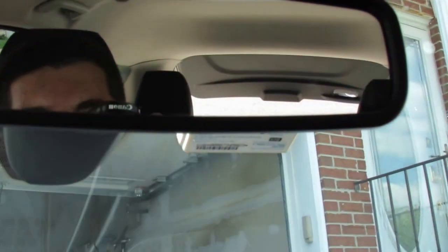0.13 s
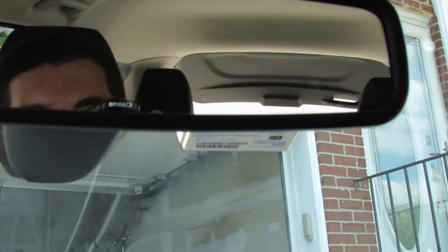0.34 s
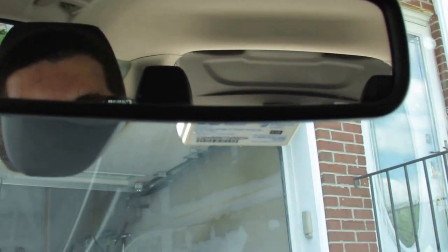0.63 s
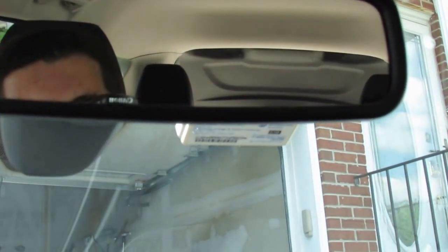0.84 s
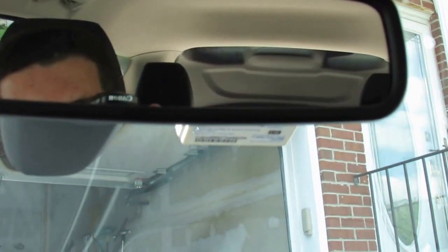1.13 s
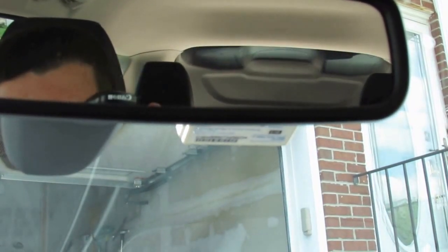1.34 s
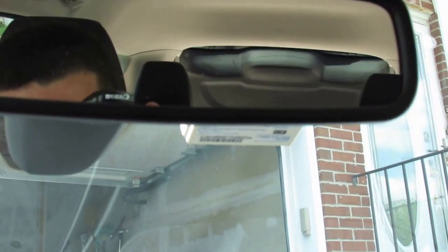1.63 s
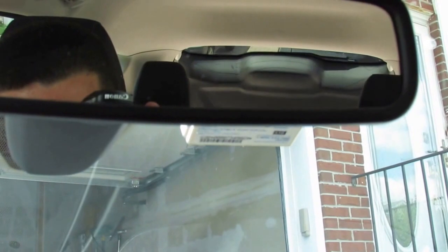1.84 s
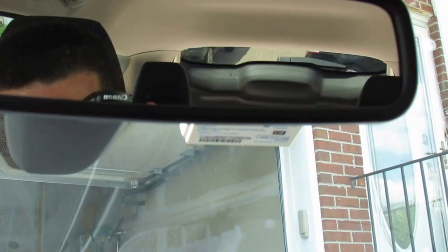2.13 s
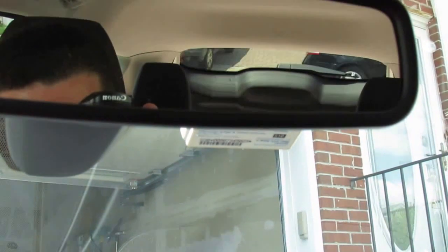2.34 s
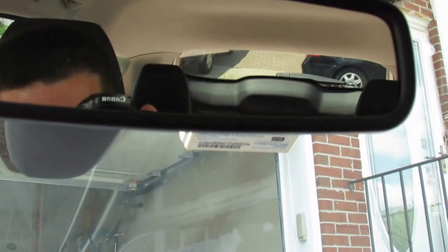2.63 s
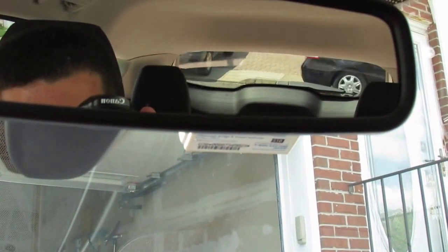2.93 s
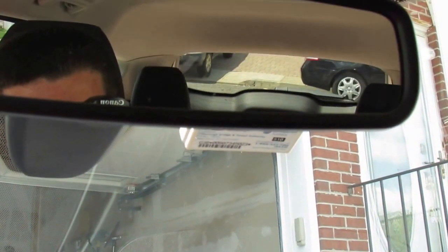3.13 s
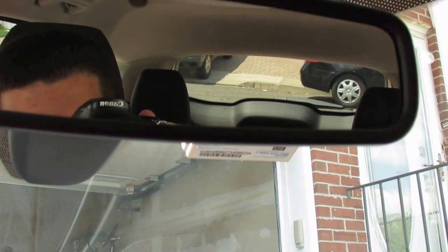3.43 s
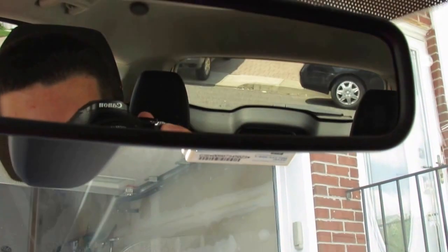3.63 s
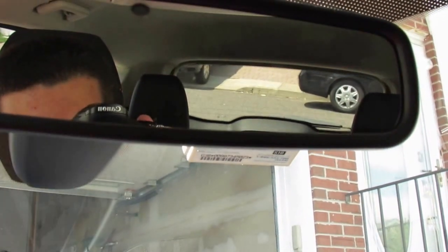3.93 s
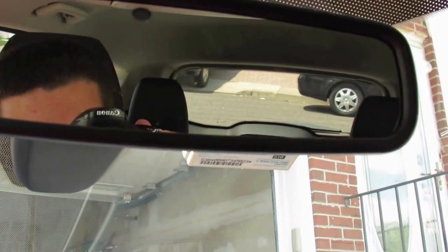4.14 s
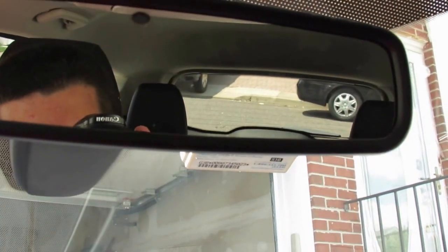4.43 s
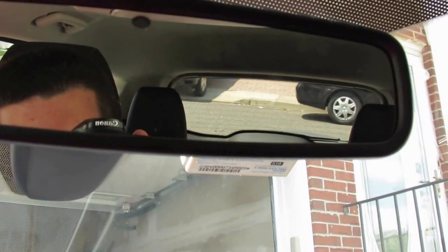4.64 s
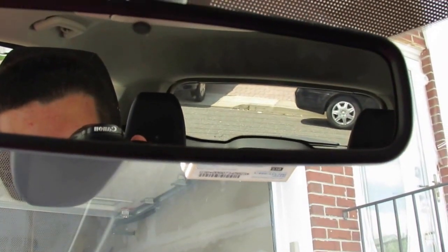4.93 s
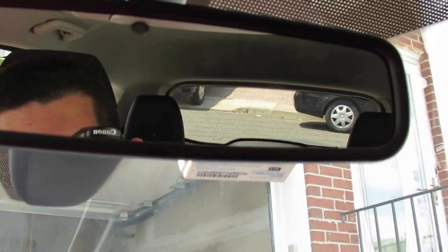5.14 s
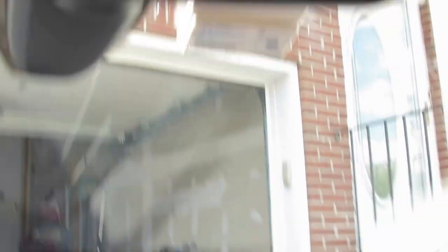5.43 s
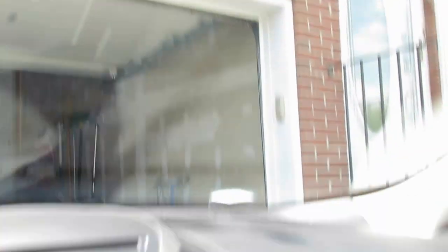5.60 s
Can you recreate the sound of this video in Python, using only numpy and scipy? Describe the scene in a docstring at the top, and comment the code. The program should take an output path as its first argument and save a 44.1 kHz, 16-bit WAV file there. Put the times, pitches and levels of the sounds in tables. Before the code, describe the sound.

Inside a parked car, the engine idles under a steady rush of air while the motorised rear hatch lowers with a low, rough hum. The hatch lands with a deep thump and a sharp metallic clack. The motor hums again briefly and the lock pulls tight with a hollow clunk. A few faint scuffs and ticks follow as the hand-held microphone is moved.

```python
"""An engine idles and air rushes, heard inside a car parked at a garage, as the power liftgate hums down.
The gate drops into its latch: the steel catch clacks, and the gate pumps the cabin air into a deep thump.
A moment later the motor cinches the lock, whose bolt and pawl strike with a hollow clunk.
The hand-held camera, whose gain ducks under the thump, is then swung away with a few scuffs and ticks."""
import sys
import numpy as np
from scipy import signal
from scipy.fft import irfft, next_fast_len
from scipy.io import wavfile
from scipy.ndimage import uniform_filter1d

SR = 44100
rng = np.random.default_rng(int(sys.argv[2]) if len(sys.argv) > 2 else 0)


def transcribe(u):
    """Save the signal u as a 16-bit wav file named by the first command-line argument.

    u: samples, shape (n,) or (channels, n), limited to [-1, 1]; the rate is SR.
    q: integer samples, one column per channel.
    """
    v = np.clip(np.atleast_2d(u).T, -1, 1)
    q = np.round(v * 32767).astype(np.int16)
    wavfile.write(sys.argv[1], SR, q)


N = 254192

CUTOFF_HZ = 15800
TRIM_BALANCE_DB = -3  # the trim lies to the right
# lean of the cabin's sound field: (frequency [Hz], left minus right [dB])
CABIN_BALANCE = [(30, 14.5), (70, 7.5), (250, -7), (700, -2), (2000, -3), (5000, -1), (14000, -1)]
# spectrum of a knock on the trim: (frequency [Hz], relative density [dB])
KNOCK_SPECTRUM = [(150, -31), (280, 4), (390, 5.5), (490, -1), (610, 4), (760, 3), (1100, -9), (1450, -15),
                  (3000, -16.5), (8000, -55)]


def from_db(db):
    """Amplitude ratio of a level in decibels."""
    return 10 ** (np.asarray(db) / 20)


def rms_one(x):
    """Normalisation to unit rms."""
    return x / np.sqrt(np.mean(x ** 2) + 1e-20)


def fade_in(start, attack_s):
    """Linear onset from 0 to 1, then a hold."""
    return np.clip((np.arange(N) / SR - start) / attack_s, 0, 1)


def at_hz(points, hz):
    """Interpolation on a log-frequency axis."""
    frequencies, values = np.transpose(points)
    return np.interp(np.log(hz), np.log(frequencies), values)


def pan(balance_db):
    """Left and right gains for a level difference."""
    return from_db(np.array([[.5], [-.5]]) * balance_db)


def drift(rate_hz):
    """Random modulation: low-passed noise of unit rms."""
    white = rng.standard_normal(N // 64 + 4000)
    r = np.exp(-2 * np.pi * rate_hz * 64 / SR)
    slow = signal.lfilter([1], [1, -2 * r, r * r], white)[3998:]
    return np.interp(np.arange(N) / 64, np.arange(len(slow)), rms_one(slow))


def clicks(times, sizes):
    """Impulse train, one impulse for each event."""
    out = np.zeros(N)
    np.add.at(out, np.round(times * SR).astype(int), sizes)
    return out


def ring(force, hz, t60):
    """Damped oscillator: a unit impulse starts a decaying sine of height 1."""
    r, w = np.exp(-np.log(1000) / (t60 * SR)), 2 * np.pi * hz / SR
    return signal.lfilter([0, np.sin(w)], [1, -2 * r * np.cos(w), r * r], force + 1e-18)


def reverberant_decay(times, level_db, t60, build_s):
    """Envelope of dense modes: each blow's energy builds with the first reflections, then leaks away."""
    keep, rise = np.exp(-2 * np.log(1000) / (t60 * SR)), np.exp(-1 / (build_s * SR))
    energy = signal.lfilter([1], [1, -keep], clicks(times, from_db(level_db) ** 2) + 1e-18)
    return np.sqrt(signal.lfilter([1 - rise], [1, -rise], energy))


def noise(spectrum):
    """Diffuse field: coloured stereo noise of unit rms, partly coherent in the bass, barely so on top."""
    # likeness of left and right: (frequency [Hz], correlation [-1 to 1])
    coherence = [(30, 0.4), (120, 0.8), (300, 0.54), (1000, 0.15), (2200, 0.06), (5000, 0.15),
                 (14000, -0.02)]
    size = next_fast_len(N, True)
    hz = np.maximum(np.arange(size // 2 + 1) * SR / size, 1)
    colour = from_db(at_hz(spectrum, hz)) * (hz > 20) * (hz < CUTOFF_HZ)
    mid, side = colour * (rng.standard_normal((2, len(hz))) + 1j * rng.standard_normal((2, len(hz))))
    alike = at_hz(coherence, hz)
    pair = np.sqrt(1 + alike) * mid + np.sqrt(1 - alike) * side * [[1], [-1]]
    return rms_one(irfft(pair * pan(at_hz(CABIN_BALANCE, hz)), size)[:, :N])


def resonances(modes):
    """Resonance under random forcing: each mode passes a narrow band of noise."""
    return sum(from_db(db) * rms_one(ring(rng.standard_normal(N), hz, np.log(1000) / (np.pi * width)))
               for hz, width, db in modes)


def engine(crank_hz=12.87, wander=0.0019, idle_db=-31.5, balance_db=-12.5, port_phase_rad=0.45):
    """Periodic forcing: firing orders and accessory whine follow one slightly unsteady crankshaft."""
    # four-cylinder idle: (order [multiple of crank speed], relative level [dB])
    orders = [(2, 2.5), (4, -2.5), (6, -6.5), (8, -13), (10, -14), (11, -19)]
    # belt-driven accessories: (frequency [Hz], level [dB], left minus right [dB])
    accessories = [(35.4, -46, 12), (180, -41.5, 1.5), (360, -45, 0), (540, -60, -3)]
    crank_time = np.cumsum(1 + wander * drift(1.94)) / SR
    stereo_phase = np.array([[port_phase_rad], [-port_phase_rad]])

    def tone(hz, flutter_db):
        flutter = from_db(flutter_db * drift(3.9))
        return flutter * np.sin(2 * np.pi * (hz * crank_time + rng.random()) + stereo_phase)
    firing = sum(from_db(db) * tone(k * crank_hz, 0.75) * pan(at_hz(CABIN_BALANCE, k * crank_hz))
                 for k, db in orders)
    whine = sum(from_db(db) * tone(hz, 2.5) * pan(lean) for hz, db, lean in accessories)
    return from_db(idle_db) * firing * pan(balance_db) + whine


def ventilation(level_db=-35.5, flicker_db=0.76, duct_balance_db=-3.0):
    """Broadband flow noise: a steady rush of air, coloured by duct resonances."""
    # ventilation and engine-bay noise: (frequency [Hz], relative density [dB])
    air_spectrum = [(20, 1.5), (45, 1), (100, 0), (150, -0.5), (220, -6.5), (420, -8.5), (680, -15.5),
                    (980, -17), (1200, -21.5), (2200, -27), (4200, -36.5), (6600, -39.5), (9500, -44),
                    (15500, -49.5)]
    # air-duct resonances: (frequency [Hz], bandwidth [Hz], level [dB])
    duct_modes = [(414, 22, -57), (538.6, 19, -59.5), (757, 61, -59), (957, 67, -55.5), (1575, 55, -76),
                  (2357, 71, -75)]
    rush = from_db(level_db + flicker_db * drift(9.0)) * noise(air_spectrum)
    return rush + resonances(duct_modes) * pan(duct_balance_db)


def gate_drive(spin_up_s=0.0077, run_down_s=0.28, ease_from_s=1.66, ease_db_per_s=3.0, evenness=0.4):
    """Forced vibration: the geared motors shake the rear panels into a low, rough hum."""
    # the motors lower the gate, then work the lock: (start [s], stop [s], level [dB])
    motor_runs = [(0, 4.37, -36.5), (4.451, 5.38, -38)]
    # rear-panel resonances: (frequency [Hz], bandwidth [Hz], relative level [dB])
    panel_modes = [(122.2, 13.4, 1.5), (139.3, 9.3, 0)]
    hum = resonances(panel_modes)
    power = uniform_filter1d(hum ** 2, size=SR // 6) + 1e-9
    even_hum = rms_one(hum / power ** (evenness / 2))
    t, effort = np.arange(N) / SR, np.zeros(N)
    for start, stop, db in motor_runs:
        ease_db = ease_db_per_s * np.maximum(t - start - ease_from_s, 0)  # load falls late in a long run
        run_down = np.exp(-np.maximum(t - stop, 0) / run_down_s)
        effort += from_db(db - ease_db) * fade_in(start, spin_up_s) * run_down
    return effort * even_hum * pan(balance_db=-5.5)


def chatter(touches=3, gap_s=.006, loss_db=11.5):
    """Inelastic rebound: each contact of gate and latch is a quick run of ever weaker touches."""
    # the catch meets the striker, the gate lands and rebounds, the catch snaps home, the trim ticks,
    # the cinch draws the gate in: (time [s], thud level [dB], knock level [dB], clack level [dB])
    contacts = [(4.004, -27, -35, -34.5), (4.022, -17, -27.5, -35), (4.0515, -16.5, -33, -29),
                (4.088, -27, -30.5, -38.5), (4.115, -34, -19.5, -16), (4.3795, -59, -57, -53),
                (4.4035, -55, -53, -52), (4.762, -46, -41, -49.5), (4.836, -49, -53, -58),
                (5.062, -27.5, -41, -70)]
    return np.transpose([(s + k * gap_s, *(np.array(levels_db) - k * loss_db))
                         for s, *levels_db in contacts for k in range(touches)])


def latch(catch_ring_db=-8.0, trim_ring_db=-12.5, scatter_db=4.0, crack_db=-2.5, hardness=0.27):
    """Impact excitation: each contact thuds in the gate, knocks the trim and rings the steel catch."""
    # gate shell and steel catch: (frequency [Hz], relative density [dB])
    thud_spectrum = [(60, -6.5), (140, 8), (260, -6.5), (450, -7), (900, -19.5), (2500, -76)]
    clack_spectrum = [(300, -36), (800, 2), (1400, 4), (2500, -1.5), (3300, 3), (4000, 2.5), (4600, 1),
                      (5200, -3), (6700, -3), (7600, -7), (11000, -13.5), (15500, -29)]
    # modes of catch and trim panel: (frequency [Hz], relative level [dB], t60 [s])
    catch_modes = [(1325, -15, .09), (1658, -14, .09), (1997, -8, .06), (2168, -8, .1), (2546, -12, .085),
                   (3208, -8, .06), (3309, -6, .08), (3417, -4, .075), (4210, -8, .09), (4739, -6, .09),
                   (5184, -11, .09), (5819, -11, .06), (6364, -11, .08), (6698, -7, .085)]
    trim_modes = [(400, -3, .06), (480, 1, .14), (603, 1, .14), (651, -4, .1), (958, -2, .1),
                  (1130, -7, .05)]
    times, thud_db, knock_db, clack_db = chatter()
    thud = noise(thud_spectrum) * reverberant_decay(times, thud_db, t60=0.14, build_s=.002)
    knock = noise(KNOCK_SPECTRUM) * reverberant_decay(times, knock_db, t60=0.11, build_s=.002)
    steel = noise(clack_spectrum)
    body = signal.sosfiltfilt(signal.butter(4, 7500, fs=SR, output="sos"), steel)
    top = steel - body
    top_db = clack_db + hardness * (clack_db - clack_db.max())  # harder contacts are brighter

    def strike(body_t60, top_t60, build_s):
        return (body * reverberant_decay(times, clack_db, body_t60, build_s)
                + top * reverberant_decay(times, top_db, top_t60, build_s))
    clack = strike(body_t60=0.086, top_t60=0.055, build_s=0.0065)  # upholstery absorbs the top first
    crack = strike(body_t60=.018, top_t60=.018, build_s=1 / SR)  # direct sound, ahead of the reflections
    out = thud + pan(TRIM_BALANCE_DB) * knock + clack + from_db(crack_db) * crack
    for modes, blow_db, lean_db in ((catch_modes, clack_db + catch_ring_db, 0),
                                    (trim_modes, knock_db + trim_ring_db, TRIM_BALANCE_DB)):
        for hz, db, t60 in modes:
            sizes = from_db(blow_db + db + scatter_db * rng.standard_normal(len(times)))
            force = clicks(times, sizes * rng.choice([-1, 1], len(times)))
            out += pan(at_hz(CABIN_BALANCE, hz) + lean_db) * ring(force, hz, t60)
    return out


def thump(push_s=0.007, balance_db=1.0, right_lag_s=0.0025):
    """Cavity resonance: the gate thumps the cabin air. Soft low bumps follow, some from camera handling."""
    # the gate's landing, then the soft bumps: (time [s], level [dB])
    pulses = [(4.026, -3), (4.081, -0.5), (4.134, -4), (4.755, -20), (4.838, -13), (5.145, -21),
              (5.23, -14.5)]
    # low modes of the thump and the bumps: (frequency [Hz], relative level [dB], t60 [s])
    low_modes = [(32, -1.5, .14), (48, .5, .27), (125, -14, .25)]
    t = np.arange(N) / SR
    force = sum(from_db(db) * np.exp(-np.pi * ((t - s) / push_s) ** 2) for s, db in pulses) / (push_s * SR)
    boom = -sum((-1) ** k * from_db(db) * ring(force, hz, t60)
                for k, (hz, db, t60) in enumerate(low_modes))
    return pan(balance_db) * [boom, np.interp(t - right_lag_s, t, boom)]


def lock(ring_db=-24.0, housing_balance_db=-4.0, click_balance_db=0.5):
    """Free vibration after impact: the bolt rings the hollow lock housing; the pawl clicks in behind."""
    # bolt first, then pawl: (time [s], knock level [dB], click level [dB])
    blows = [(4.9226, -23, -44), (4.9237, -29, -28.5), (4.931, -26, -31.5)]
    # modes of the housing: (frequency [Hz], relative level [dB], t60 [s])
    housing_modes = [(128, -8, .2), (255, -7, .12), (387, -3, .08), (480, -5, .05), (603, 2, .12),
                     (772, -7, .08), (847, -7, .08), (969, -6, .13), (1115, -8, .07), (1538, -17, .1),
                     (2036, -11, .095), (2637, -17, .09), (2826, -15, .05), (3155, -18, .06)]
    # click of the pawl: (frequency [Hz], relative density [dB])
    pawl_spectrum = [(400, -12), (1000, 8.5), (2500, -1), (3600, 2), (5000, -5), (7500, -5), (10000, -14),
                     (15500, -28)]
    times, knock_db, click_db = np.transpose(blows)
    knock = noise(KNOCK_SPECTRUM) * reverberant_decay(times, knock_db, t60=0.13, build_s=0.0012)
    click = noise(pawl_spectrum) * reverberant_decay(times, click_db, t60=0.083, build_s=0.002)
    bolt = clicks(times[:1], from_db(ring_db))
    housing = sum((-1) ** k * from_db(db) * ring(bolt, hz, t60)
                  for k, (hz, db, t60) in enumerate(housing_modes))
    return knock * pan(TRIM_BALANCE_DB) + click * pan(click_balance_db) + housing * pan(housing_balance_db)


def handling(swing_s=5.22, rub_db=-57, roughness_db=3.0, grain_db=3.0):
    """Structure-borne sound: fingers rub, slip and tap on the camera body as it is swung away."""
    # finger slips: (time [s], half length [s], skin hiss level [dB], body scrape level [dB])
    scuffs = [(5.256, .014, -75, -53), (5.305, 0.013, -62, -52), (5.385, .007, -56.5, -60),
              (5.456, 0.0091, -62, -50), (5.536, .009, -58, -58), (5.645, 0.017, -55.5, -51)]
    # finger taps: (time [s], level [dB])
    taps = [(5.555, -24), (5.689, -37)]
    # camera body and sliding skin: (frequency [Hz], relative density [dB])
    body_spectrum = [(300, -34), (1100, 3.5), (1700, 1.5), (2800, -10.5), (6500, -14.5), (9500, -22),
                     (15500, -30)]
    skin_spectrum = [(500, -20), (2000, 10), (5000, 0), (9000, 0), (11500, -3), (15500, -16)]
    t = np.arange(N) / SR
    ticks = reverberant_decay(*np.transpose(taps), t60=0.0094, build_s=0.0003)
    rub = fade_in(swing_s, attack_s=0.075) * from_db(rub_db + roughness_db * drift(40))
    slips = sum(from_db([[hiss_db], [scrape_db]]) * np.exp(-.5 * ((t - s) / half_s) ** 2)
                for s, half_s, hiss_db, scrape_db in scuffs)
    hiss, scrape = slips * from_db(grain_db * drift(200))
    return np.sqrt(ticks ** 2 + rub ** 2 + scrape ** 2) * noise(body_spectrum) + hiss * noise(skin_spectrum)


def scene():
    """Superposition of all sources at the driver's seat."""
    return engine() + ventilation() + gate_drive() + latch() + thump() + lock() + handling()


def gain_control(x, threshold_db=-7.0, release_db_per_s=9.0, attack_s=0.08):
    """Compression: peaks over the threshold pull the gain down, and it creeps back."""
    over_db = np.maximum(20 * np.log10(np.abs(x).max(axis=0) + 1e-9) - threshold_db, 0)
    release_db = release_db_per_s * np.arange(N) / SR
    held_db = np.maximum.accumulate(over_db + release_db) - release_db
    r = np.exp(-1 / (attack_s * SR))
    return x * from_db(-signal.lfilter([1 - r], [1, -r], held_db))


def record(dry):
    """Automatic gain, then band limiting by a steep low-pass filter."""
    return signal.sosfilt(signal.ellip(12, .1, 80, CUTOFF_HZ, fs=SR, output="sos"), gain_control(dry))


dry = scene()
out = record(dry)
transcribe(out)
```